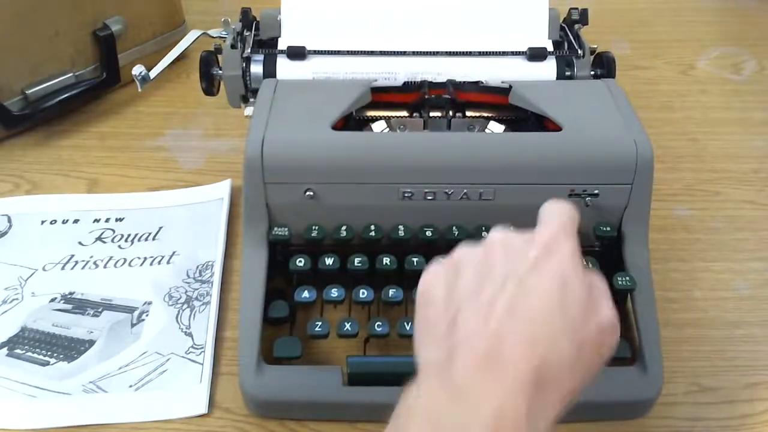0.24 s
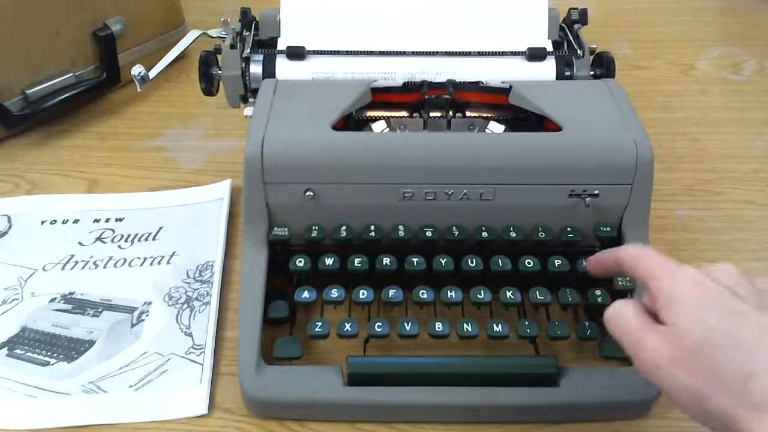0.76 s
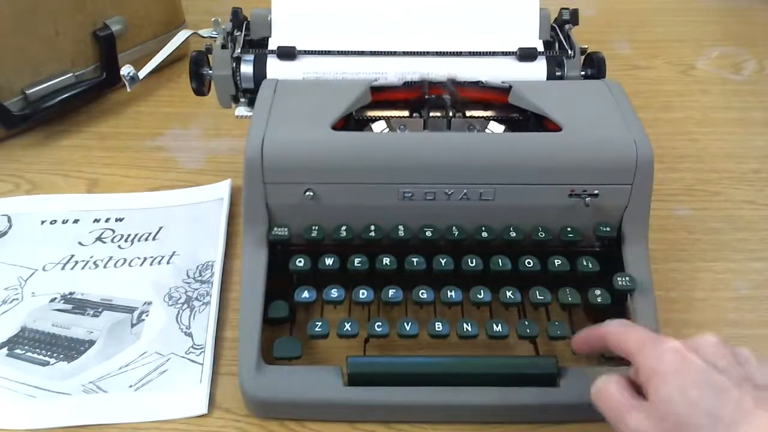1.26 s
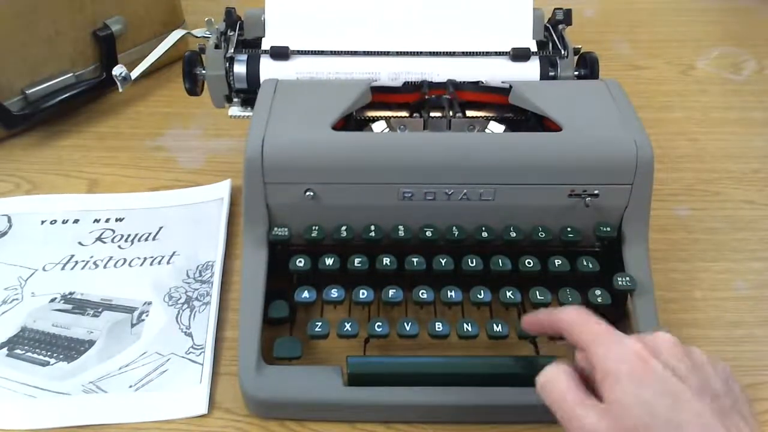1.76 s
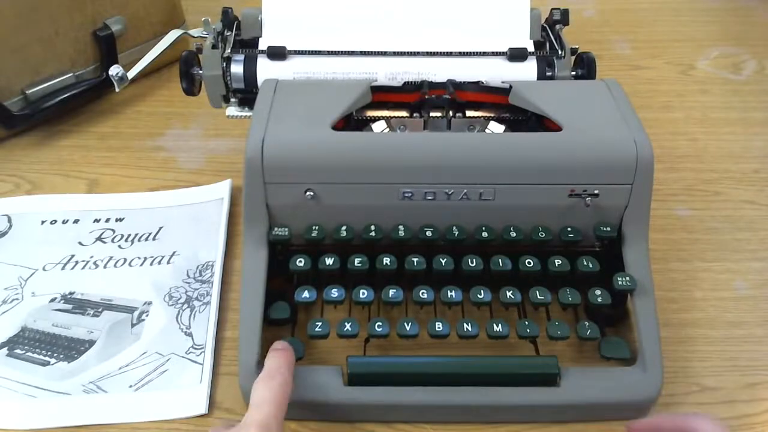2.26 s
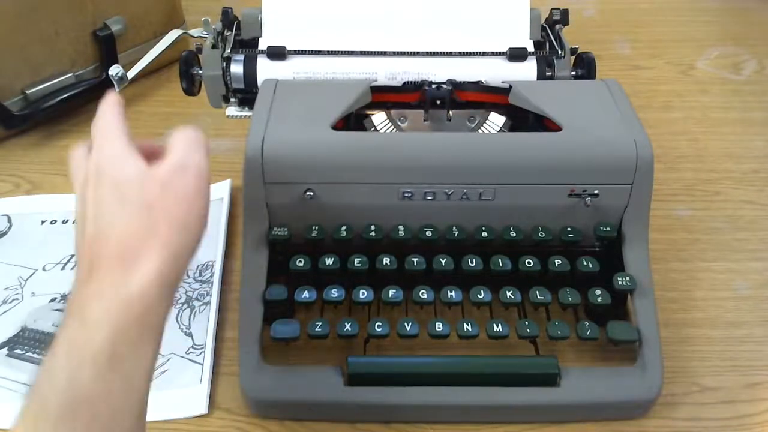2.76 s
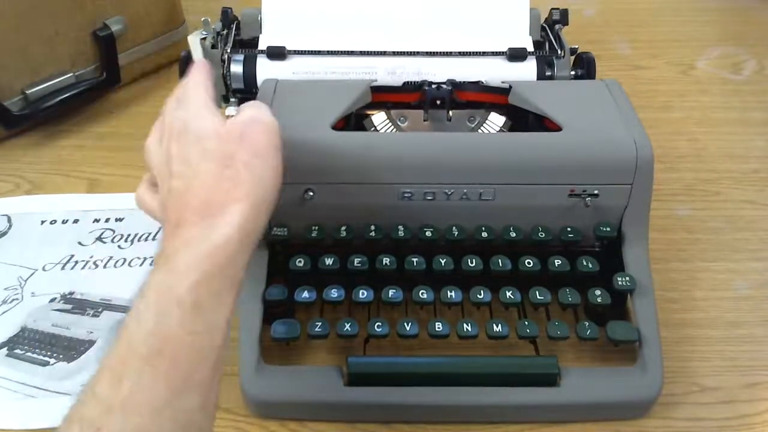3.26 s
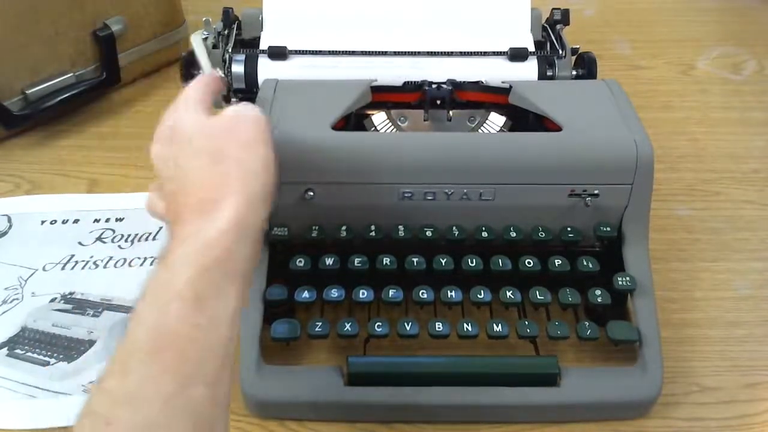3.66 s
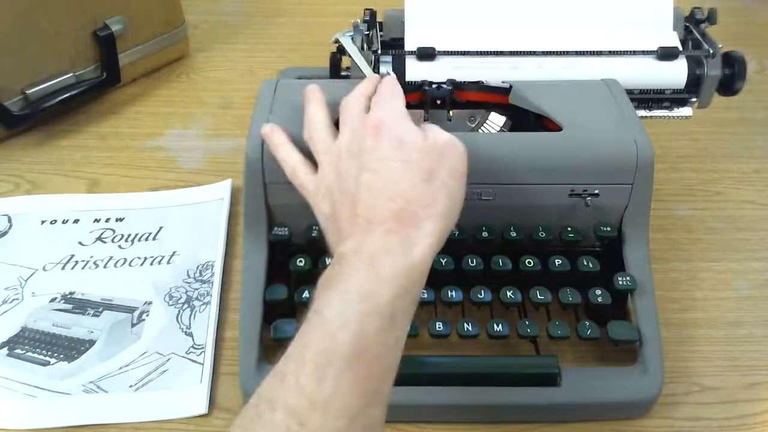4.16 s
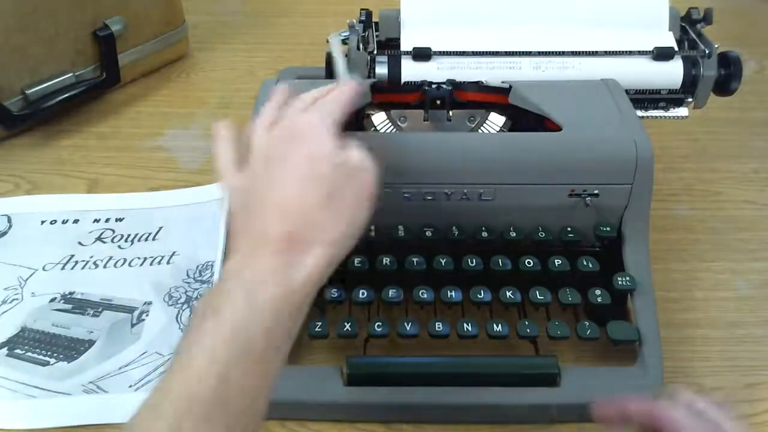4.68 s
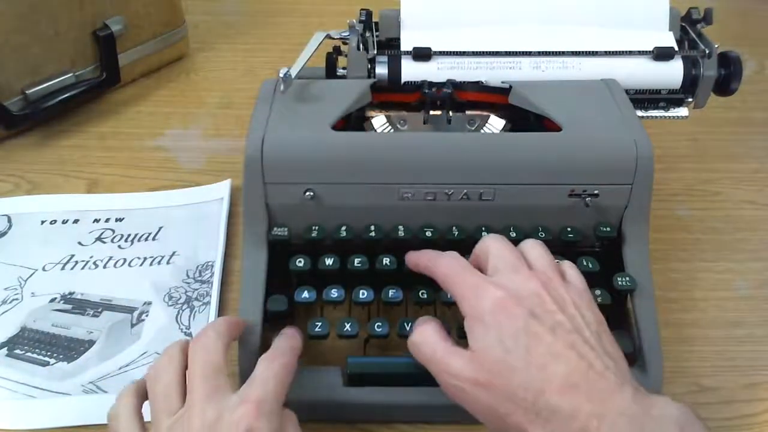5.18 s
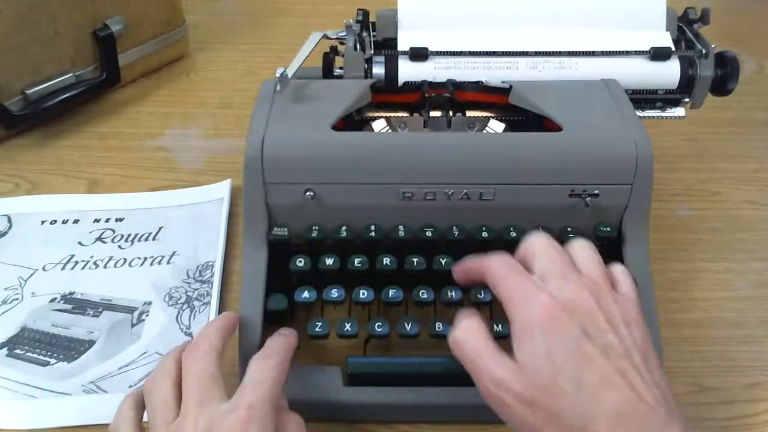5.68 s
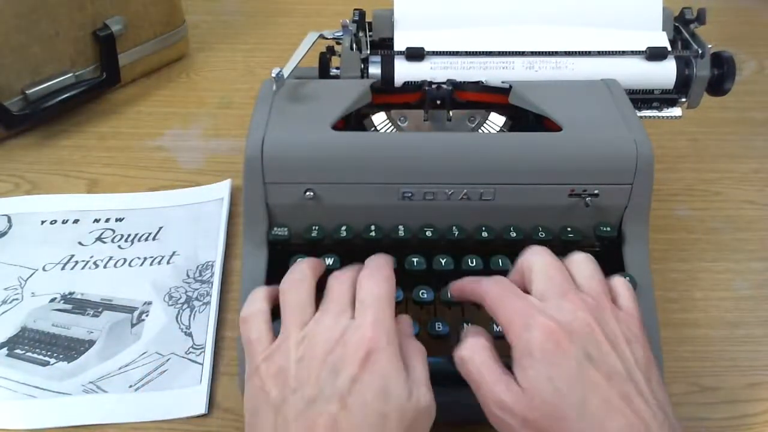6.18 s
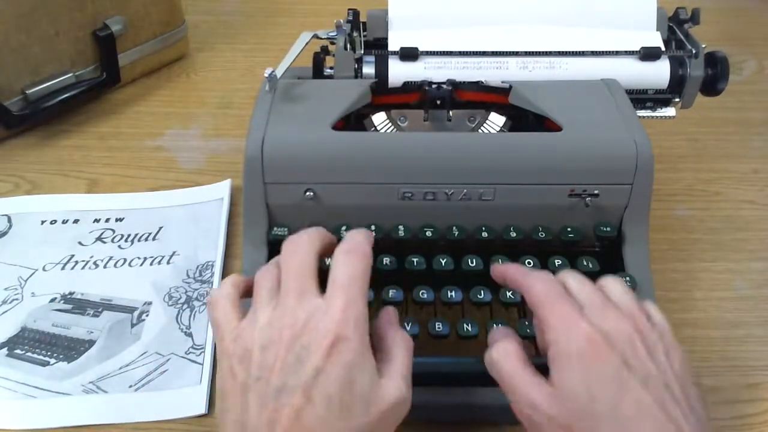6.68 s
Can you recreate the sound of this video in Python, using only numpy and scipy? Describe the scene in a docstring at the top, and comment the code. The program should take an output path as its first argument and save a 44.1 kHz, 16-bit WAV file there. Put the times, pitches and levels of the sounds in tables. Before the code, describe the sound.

Close typing on a mechanical typewriter, with metal rattles and desk thumps, broken midway by a short rasping carriage return.

```python
"""A portable manual typewriter, close up, on a wooden desk in a small bare room.
Typebars slap the platen, the carriage steps and the bars fall back; each contact rattles and rings
the metal parts, and keys and shift thump the desk. Midway the line lever clicks, the carriage is
pushed back along its rail to the stop, pawl rasping over the teeth, and typing resumes.
Faint room tone lies underneath; a narrow-band microphone rounds off the hardest slaps."""
import sys
import numpy as np
from scipy import signal
from scipy.fft import rfft, irfft, next_fast_len
from scipy.io import wavfile

SR = 44100
rng = np.random.default_rng(int(sys.argv[2]) if len(sys.argv) > 2 else 0)


def to_wav(s):
    """Save 16-bit WAV."""
    ch = np.atleast_2d(s).T  # columns
    pcm = np.round(np.clip(ch, -1, 1) * 32767)  # PCM
    wavfile.write(sys.argv[1], SR, pcm.astype(np.int16))


N = 305613
T = np.arange(SR // 2) / SR  # time axis of one event [s]

# balance of the part groups per kind of contact: (shell [dB], linkage [dB], segment [dB], steel [dB])
STRIKE_MIX_DB, STEP_MIX_DB = (-1, -0.8, -3.7, 1.06), (0, -0.5, -10.5, -13)
FALL_MIX_DB = (0.74, -1, -14.5, -16.5)
TOUCH_MIX_DB, STOP_MIX_DB = (-1.5, 0, -5, -4), (0, -2.5, -12.5, -18.5)
# gain of the same groups per dB of brightness [dB/dB]
STRIKE_TILT, RETURN_TILT = (0.043, 0, 0.52, 0.11), (-0.18, 0, 0.77, 0.94)
CLACK_TILT = (-0.13, 0.0089, 1.3, 1.24)
STRIKE_T60_S, STEP_T60_S, FALL_T60_S, CUSHION_RISE_S = 0.29, 0.28, 0.24, .0036


# keystrokes: (strike time [s], slap [dB], slap pitch [Hz], strike [dB], thump [dB], thump pitch [Hz],
# step time [s], step [dB], fall time [s], fall [dB], thud [dB], thud pitch [Hz], brightness [dB])
KEYSTROKES = [(0.0005, -13.5, 5000, -29.8, -21, 178, 0.062, -33, 0.098, -29, -15, 153, 0.5),
              (0.2051, -9.5, 5000, -28, -23, 255, 0.275, -30, 0.312, -29, -17.5, 161, 1),
              (0.7672, -7.5, 4900, -27, -24, 175, 0.859, -31.5, 0.898, -30, -21.5, 216, -3),
              (1.002, -11.5, 4900, -27.5, -25, 169, 1.044, -30, 1.107, -30, -14, 153.5, -4),
              (1.2062, -10.5, 5000, -28, -24, 183, 1.243, -27.5, 1.288, -27.5, -20, 155, 0.5),
              (1.3836, -10.5, 5000, -28.5, -21, 216.5, 1.475, -36, 1.512, -30.5, -24.5, 220, -0.5),
              (1.619, -11.5, 5000, -28.2, -29, 154.4, 1.662, -28.5, 1.703, -27.5, -20.5, 197, 0.5),
              (1.8107, -13, 5000, -28.6, -24, 177.4, 1.868, -27.5, 1.911, -30, -24.5, 165, -1.5),
              (5.5798, 1.5, 4800, -29.3, -19, 172, 5.635, -31, 5.674, -27, -23.5, 176, 11),
              (6.174, -2.5, 5000, -30, -29, 146, 6.224, -29, 6.252, -27.5, -26.5, 197, 10.5),
              (6.296, -1.5, 4550, -28.5, -17, 201, 6.387, -31.5, 6.421, -29.5, -22.5, 182, 10.5),
              (6.9179, 2.5, 4800, -22, -17, 213, 6.98, -30, 7.1, -30.5, -20, 170, 12.5)]

def typebars():
    """Per keystroke the type strikes, the key bottoms out, the carriage steps, the bar falls back."""
    out = np.zeros(N)
    for (s, slap_db, slap_hz, strike_db, thump_db, thump_hz,
         step_s, step_db, fall_s, fall_db, thud_db, thud_hz, bright_db) in KEYSTROKES:
        out += desk(s - .025, db=-43, hz=172)  # finger loads the desk
        out += strike(s, slap_db, slap_hz, part_levels(strike_db, STRIKE_MIX_DB, bright_db, STRIKE_TILT))
        out += thud(s + .008, thump_db, thump_hz)
        bottom_parts_db = part_levels(strike_db - 6, STEP_MIX_DB, bright_db)
        out += clack(s + .022, bottom_parts_db, STEP_T60_S)
        step_parts_db = part_levels(step_db, STEP_MIX_DB, bright_db, RETURN_TILT)
        out += clack(step_s, step_parts_db, STEP_T60_S, CUSHION_RISE_S)
        out += desk(step_s + .0121, step_db + 6.2, hz=165 * (1 + .06 * rng.normal()))
        fall_parts_db = part_levels(fall_db, FALL_MIX_DB, bright_db, RETURN_TILT)
        out += clack(fall_s, fall_parts_db, FALL_T60_S, CUSHION_RISE_S)
        out += thud(fall_s + .016, thud_db, thud_hz)
    return out


def strike(s, slap_db, slap_hz, parts_db, lead_s=.0009):
    """A bar swishes up through the segment, slaps the paper and shakes the machine."""
    out = np.zeros(N)
    swish = approach(parts_db, t60_s=.03 * amp(-.35 * slap_db))  # harder slap, shorter swish
    add(out, s - len(swish) / SR, amp(-3.5) * swish)
    rebound_db = -11.5 - 0.3 * slap_db  # softer slap, larger share of buzz
    add(out, s - lead_s, amp(slap_db - 2.5) * slap(slap_hz, lead_s, rebound_db))
    add(out, s, amp(-0.88) * blow(parts_db, STRIKE_T60_S, rise_s=.0024, ring_db=3, knock_db=-12))
    return out


def slap(hz, lead_s, rebound_db, width_s=.00021, rebound_t60_s=.023):
    """Type meets the platen: a snap of about two cycles, then a brief buzzing rebound."""
    t = T[:SR // 20] - lead_s
    snap = np.exp(-(t / width_s) ** 2) * np.cos(2 * np.pi * hz * (1 + 0.046 * rng.normal()) * t)
    rebound = coloured(rng.standard_normal(len(t)), STEEL_SPECTRUM) * fade(rebound_t60_s)[:len(t)]
    return snap + amp(rebound_db) * rebound * (t > 0)


# spectra of the four part groups: (frequency [Hz], level [dB])
SHELL_SPECTRUM = [(200, -20.5), (320, 0), (450, 1), (630, 0), (760, -2.5), (900, 3), (1080, -0.5),
                  (1300, -15.5), (2000, -55.5)]
LINKAGE_SPECTRUM = [(600, -39.5), (1000, -10), (1150, -2), (1350, 2.5), (1580, 0.5), (1860, -0.5),
                    (2200, -12), (2500, -26.5), (3200, -37.5), (5000, -59)]
SEGMENT_SPECTRUM = [(1400, -38.5), (2100, 1), (2400, -0.5), (2800, -1.5), (3100, -2.5), (3350, -2.5),
                    (3900, -1), (4300, -17.5), (5500, -41)]
STEEL_SPECTRUM = [(2000, -33.5), (3600, -22), (4100, -3.5), (4900, 1), (5700, -2.5), (6400, -4),
                  (7100, -10.5), (7800, -26.5)]
# frame and typebar modes under a free strike: (frequency [Hz], level [dB], t60 [s])
FRAME_MODES = [(583.5, -14.5, 0.26), (640, -11, 0.28), (887, -10.5, .25), (1150, -15, 0.26),
               (1295, -10.5, .31), (1395, -11, 0.3), (1777, -10.5, 0.099), (1855, -9, 0.17),
               (3402, -18, 0.18), (3655, -15, 0.18), (4600, -17, 0.18), (4872, -16, 0.18),
               (5453, -16.5, 0.19), (6429, -20.5, 0.2)]

def blow(parts_db, t60_s, rise_s, ring_db, knock_db, grit_db=2, crossovers_hz=(1100, 2300, 4000)):
    """One impact: a dry knock, the part groups rattle, frame and typebars ring."""
    out = np.zeros(len(T))
    for spectrum, db in zip((SHELL_SPECTRUM, LINKAGE_SPECTRUM), parts_db):
        out += amp(db) * coloured(chatter(len(T), grit_db), spectrum, ripple_db=2)
    out *= 1 + amp(knock_db) * fade(t60_s=.06)
    # treble rattle: a smooth hiss fades first, leaving a randomly uneven, slightly tonal tail
    for spectrum, db in zip((SEGMENT_SPECTRUM, STEEL_SPECTRUM), parts_db[2:]):
        hiss = coloured(chatter(len(T), grit_db), spectrum, ripple_db=2) * fade(t60_s=.4)
        tail = coloured(chatter(len(T), grit_db), spectrum, ripple_db=7.5, ripple_hz=55)
        out += amp(db) * (amp(-4.5) * hiss + amp(-1.1) * tail)
    out *= fade(t60_s)
    for hz, db, mode_t60_s in FRAME_MODES:
        part_db = parts_db[np.searchsorted(crossovers_hz, hz)]
        cycles = hz * (1 + 0.002 * rng.normal()) * T + rng.random()
        decay = fade(mode_t60_s * t60_s / STRIKE_T60_S)  # damped blows ring shorter
        out += amp(part_db + db + ring_db + rng.normal(0, 2.0)) * decay * np.sin(2 * np.pi * cycles)
    return out * rise(rise_s)


def approach(parts_db, t60_s):
    """A moving lever scrapes, swelling up to the moment of contact."""
    size = SR // 10
    spectra = (SHELL_SPECTRUM, LINKAGE_SPECTRUM, SEGMENT_SPECTRUM, STEEL_SPECTRUM)
    friction = sum(amp(db) * coloured(chatter(size, grit_db=5.5), spectrum)
                   for spectrum, db in zip(spectra, parts_db))
    swell = (fade(t60_s) * rise(.0004))[:size][::-1]
    return friction * swell


def clack(s, parts_db, t60_s, rise_s=.0012):
    """A duller contact: a lever slides home and meets its stop."""
    out = np.zeros(N)
    slide = approach(parts_db, t60_s=.033)
    add(out, s - len(slide) / SR, amp(-4.5) * slide)
    add(out, s, amp(-3.5) * blow(parts_db, t60_s, rise_s, ring_db=4.5, knock_db=-8))
    return out


def part_levels(db, mix_db, bright_db, tilt=CLACK_TILT):
    """Shell, linkage, segment and steel levels [dB]; harder contacts wake more of the small parts."""
    return db + np.array(mix_db) + bright_db * np.array(tilt)


def thud(s, db, hz, rock_s=.05):
    """The machine's weight lands on the desk and rocks back once."""
    return desk(s, db, hz) + desk(s + rock_s, db - 13.5, hz * .9)


# low boom of desk and room: (frequency [Hz], level [dB])
BOOM_SPECTRUM = [(25, -39.5), (50, -27), (72, -6), (90, -9), (140, 2.5), (200, -1.5), (230, -13.5),
                 (265, 0), (330, -20), (500, -40), (1000, -72)]
# low room modes: (frequency [Hz], level [dB], t60 [s])
ROOM_MODES = [(75, -20, .32), (146.87, -7.5, .27), (265.2, -16.5, .24)]

def desk(s, db, hz, sag=0.13):
    """A push swings the desk top briefly, sinking in pitch; the room's boom and modes follow."""
    out = np.zeros(N)
    pitch_hz = hz * (1 + sag * (2 * fade(.24) - 1.3))
    swing = np.sin(2 * np.pi * np.cumsum(pitch_hz) / SR) * fade(.13) * rise(.004) ** 2
    boom = coloured(rng.standard_normal(len(T)), BOOM_SPECTRUM) * fade(.31) * rise(.0079)
    modes = sum(amp(mode_db) * fade(t60_s) * np.sin(2 * np.pi * (mode_hz * T + rng.random()))
                for mode_hz, mode_db, t60_s in ROOM_MODES)
    add(out, s, amp(db) * (amp(3.5) * swing + amp(-5.5) * boom + modes * rise(.015)))
    return out


# shift, line lever, carriage stop and space bar:
# (time [s], touch [dB], stop [dB], brightness [dB], stop t60 [s], thud [dB], thud pitch [Hz])
LEVERS = [(2.643, -42, -30.5, -0.5, .24, -16, 148), (3.276, -46, -42.5, -3, 0.26, -28, 152),
          (3.374, -58, -45.5, -7, 0.16, -28.5, 213), (3.771, -45, -35.5, 2.5, 0.14, -25, 189),
          (4.263, -59, -32, 4, 0.25, -37, 236), (4.724, -34, -34, -4, 0.21, -26.5, 240.6),
          (5.357, -65, -57, -7, 0.36, -18.5, 160), (5.838, -48, -33, -0.5, 0.22, -19.5, 160),
          (6.491, -47, -31, 3.5, 0.39, -19.5, 155), (6.594, -55, -31.5, 1, 0.32, -27.5, 141),
          (6.627, -46, -32, 6, 0.26, -28, 147)]

def levers(play_s=.016, desk_lag_s=.005):
    """Each lever takes up its play with a light touch, hits its stop and thumps the desk."""
    out = np.zeros(N)
    for s, touch_db, stop_db, bright_db, t60_s, thud_db, thud_hz in LEVERS:
        out += clack(s - play_s, part_levels(touch_db, TOUCH_MIX_DB, bright_db), t60_s=.2)
        out += clack(s, part_levels(stop_db, STOP_MIX_DB, bright_db), t60_s)
        out += thud(s + desk_lag_s, thud_db, thud_hz)
    return out


# catches, stops and knocks: (time [s], level [dB], pitch [Hz], ring t60 [s])
CATCHES = [(0.099, -30.5, 1380, .07), (0.308, -36, 4430, 0.04), (0.9, -36, 1850, .12),
           (1.004, -32, 2200, .06), (1.512, -40, 4440, 0.1), (2.377, -50, 6660, 0.075),
           (2.641, -28, 645, 0.16), (2.643, -33, 861, .18), (2.645, -39, 1350, .16),
           (2.645, -42, 1830, .17), (3.378, -30, 270, 0.11), (3.368, -45, 620, .1),
           (3.419, -40.5, 4350, 0.095), (3.756, -47, 2800, 0.067), (4.261, -29, 1880, 0.12),
           (4.262, -36, 2250, .15), (4.261, -35.5, 4680, 0.075), (4.263, -46, 4050, .22),
           (4.718, -46.5, 5100, 0.069), (4.803, -39.5, 4430, 0.065), (4.804, -43, 6200, .09),
           (4.811, -39, 4400, 0.09), (4.856, -51, 4500, 0.08), (5.36, -48, 547, 0.22),
           (5.524, -55, 780, .1), (5.816, -42, 1500, .08), (5.837, -30.5, 700, 0.07),
           (6.252, -33, 1350, .12), (6.296, -27, 3750, .035), (6.302, -28, 700, 0.057),
           (6.386, -33, 1326, .14), (6.491, -30, 1354, 0.08), (6.591, -35, 557, .05),
           (6.607, -37, 1350, .12)]

def catches(spread=0.013, mode_count=7):
    """A part snapping over rings in a tight cluster of modes, over a broader crack."""
    out = np.zeros(N)
    for s, db, hz, t60_s in CATCHES:
        detune, phase = rng.standard_normal((2, mode_count, 1))
        ring = unit(np.sin(2 * np.pi * (hz * (1 + spread * detune) * T + phase)).sum(axis=0))
        skirt = [(hz / 2, -45), (hz * .82, -3), (hz, 0), (hz * 1.35, -5), (hz * 2, -45)]
        crack = coloured(chatter(len(T), grit_db=4.5), skirt, ripple_db=-1.5)
        snap = amp(-1.5) * ring * fade(t60_s) + amp(-3) * crack * fade(1.3 * t60_s)
        add(out, s, amp(db) * snap * rise(.00066))
    return out


# rasp of the carriage return, rising with speed: (time [s], level [dB])
RASP_ENVELOPE = [(3.83, -50), (3.89, -42.5), (3.95, -32), (3.99, -29.5), (4.04, -32.5), (4.11, -33.5),
                 (4.17, -41), (4.245, -47.5)]
# spectra of the carriage parts: (frequency [Hz], level [dB])
RAIL_SPECTRUM = [(250, -59), (400, -19), (465, -11), (540, -11), (650, -4), (710, -9), (780, 4), (870, 2.5),
                 (1080, -1), (1400, -35.5)]
RACK_SPECTRUM = [(800, -15.5), (1150, -4.5), (1310, 7), (1480, 1), (1640, 2), (1850, 0), (2140, -6.5),
                 (2700, -30)]
PAWL_SPECTRUM = [(1800, -27.5), (2400, 3.5), (3200, 0), (4400, 2.5), (5000, 2), (5500, 1), (6050, 4),
                 (7000, -10.5), (7800, -27)]
# rail, rack and pawl against the rasp: (offset at full speed [dB], slope [dB/dB])
CARRIAGE_PARTS = [(-3, 1.5), (-1.4, 1.06), (-7.5, 1.09)]

def carriage(peak_teeth_per_s=140, tooth_t60_s=.016, rolling=0.8, rail_places=7):
    """The pawl rasps over the escapement teeth with the push; resonances shift along the rail."""
    out = np.zeros(N)
    times_s, rasp_db = np.transpose(RASP_ENVELOPE)
    start_s, end_s = times_s[0], times_s[-1]
    t = start_s - .1 + np.arange(SR) / SR
    effort_db = np.interp(t, times_s, rasp_db) - rasp_db.max()
    parts_db = [rasp_db.max() + db + slope * effort_db for db, slope in CARRIAGE_PARTS]
    speed = amp(effort_db / 2)
    teeth_passed = np.floor(np.cumsum(peak_teeth_per_s * speed) / SR)
    tooth_pulses = np.diff(teeth_passed, prepend=0)
    rasp = signal.fftconvolve(tooth_pulses, fade(tooth_t60_s))[:SR] + rolling
    moving = np.clip(np.minimum(t - start_s + .029, end_s + .028 - t) / .022, 0, 1)
    places_s, gap_s = np.linspace(start_s, end_s, rail_places, retstep=True)
    for place_s in places_s:
        crossfade = np.sqrt(np.clip(1 - np.abs(t - place_s) / gap_s, 0, 1))
        for db, spectrum in zip(parts_db, (RAIL_SPECTRUM, RACK_SPECTRUM, PAWL_SPECTRUM)):
            part = coloured(rasp * chatter(SR, grit_db=1.5), spectrum, ripple_db=4.5, ripple_hz=50.06)
            add(out, t[0], amp(db) * moving * crossfade * part)
    return out


# ringing spots on the rail: (time [s], level [dB], pitch [Hz], length [s])
RAIL_SPOTS = [(3.93, -37.5, 800, .09), (3.945, -33, 1320, .1), (3.96, -38, 930, .08),
              (4.06, -41, 1200, .09)]

def rail_resonances(relative_width=.03):
    """The rolling carriage makes single rail resonances swell out of the rasp."""
    out = np.zeros(N)
    edge, skirt = 1 + relative_width, 1 + 4 * relative_width
    for s, db, hz, length_s in RAIL_SPOTS:
        band = [(hz / skirt, -50), (hz / edge, 0), (hz * edge, 0), (hz * skirt, -50)]
        swell = np.sin(np.pi * np.clip(T / length_s, 0, 1))
        add(out, s, amp(db) * swell * coloured(rng.standard_normal(len(T)), band))
    return out


# key levers and bars rattling between strokes: (time [s], level [dB], t60 [s])
RATTLES = [(0.135, -35.5, .2), (0.8, -29, .14), (0.832, -34, .15), (0.93, -36, .15), (1.092, -35, .1),
           (1.335, -35, 0.18), (1.56, -41, 0.2), (1.773, -37, .16), (1.93, -37, .12), (2.661, -32, .12),
           (2.688, -33, .16), (6.279, -33, .14), (6.655, -37, .22)]

def rattles():
    """Loose levers knock against their rests, dull and brief."""
    return sum(clack(s, part_levels(db, FALL_MIX_DB, bright_db=0), t60_s, CUSHION_RISE_S)
               for s, db, t60_s in RATTLES)


# metal part sliding under the hand: (frequency [Hz], level [dB])
SCRAPE_SPECTRUM = [(1400, -35), (1700, -3), (1950, 4), (2300, -1), (3000, -2), (3800, -5), (4400, -18),
                   (6000, -15), (7100, -14), (7800, -40)]

def scrape(s=2.383, db=-34.5, rise_s=.015, t60_s=.17):
    """Metal slides on metal: a quick swell, then a dry, gritty decay."""
    out = np.zeros(N)
    swell = np.clip(T / rise_s, 0, 1) ** 2
    friction = coloured(chatter(len(T), grit_db=3), SCRAPE_SPECTRUM, ripple_db=3)
    add(out, s - rise_s, amp(db) * friction * swell * fade(t60_s))
    return out


# loose parts ticking: (time [s], level [dB], brightness [dB], t60 [s])
TICKS = [(0.713, -54, 3, 1), (0.308, -41, 6, 0.19), (1.6, -43, 6, 0.25), (1.793, -42, 3.5, 0.25),
         (2.378, -59, 5, 0.18), (3.11, -70, 7, 0.55), (3.19, -63, 5, 0.3), (3.42, -54, 6.5, 0.24),
         (3.66, -61.5, 3.5, 0.35), (4.803, -50.5, 0.5, 0.23), (4.857, -49, -3, 0.25), (5.817, -43, 1, .2)]
# soft pushes on the desk: (time [s], level [dB], pitch [Hz])
BUMPS = [(0.355, -24, 150), (0.47, -38, 161.7), (0.676, -48, 198), (0.83, -28.5, 135), (1.598, -22, 138),
         (1.985, -32.5, 160.4), (2.292, -43.5, 215), (2.41, -50, 230), (2.475, -51, 215),
         (2.664, -18.5, 150), (2.672, -27, 108), (2.686, -17.5, 150), (2.75, -27, 135), (2.778, -31, 128),
         (3.81, -29, 135), (3.845, -32, 135), (3.948, -30.5, 135), (3.99, -31, 135), (4.03, -26, 132),
         (4.169, -42, 160), (4.282, -34, 235), (4.943, -39, 203), (5.123, -45, 221), (5.312, -39, 206.2),
         (5.49, -30.5, 200), (5.765, -31, 160), (5.93, -30.5, 155.5), (6.565, -25, 162), (6.7, -32, 164)]

def handling():
    """Parts tick as the hands take hold or let go; hands and carriage bump the desk."""
    ticks = sum(clack(s, part_levels(db, TOUCH_MIX_DB, bright_db), t60_s)
                for s, db, bright_db, t60_s in TICKS)
    return ticks + sum(desk(s, db, hz) for s, db, hz in BUMPS)


# room tone: (frequency [Hz], level [dB])
ROOM_SPECTRUM = [(15, -55.5), (25, -42.5), (143, 4.5), (418, -16.5), (643, -10), (707, -11.5), (1040, -12),
                 (1250, -14), (1410, -14.5), (6520, -32), (7520, -43), (9780, -85), (16500, -120)]

def room_tone(db=-68):
    """Faint, steady, mostly low noise of the room."""
    return amp(db) * coloured(rng.standard_normal(N), ROOM_SPECTRUM)


def chatter(size, grit_db):
    """Countless tiny metal contacts of uneven strength, about 1 ms each."""
    knots = rng.standard_normal(size // 44 + 2)
    strength = np.interp(np.arange(size), np.linspace(0, size, len(knots)), knots)
    return amp(grit_db * strength) * rng.standard_normal(size)


def coloured(x, spectrum, ripple_db=0, ripple_hz=45):
    """Filter x by (frequency [Hz], level [dB]) points, to rms 1; ripple adds random peaks and dips."""
    hz, db = np.transpose(spectrum)
    size = next_fast_len(len(x))
    bins_hz = np.fft.rfftfreq(size, 1 / SR)
    knots = rng.standard_normal(400)
    ripple = ripple_db * np.interp(bins_hz / ripple_hz, np.arange(len(knots)), knots)
    gain = amp(np.interp(np.log(bins_hz + 1), np.log(hz), db) + ripple)
    return unit(irfft(rfft(x, size) * gain, size)[:len(x)])


def amp(db):
    """Decibels to gain."""
    return 10 ** (np.asarray(db) / 20)


def unit(x):
    """Scale to rms 1."""
    return x / np.sqrt(np.mean(x ** 2) + 1e-20)


def fade(t60_s):
    """Exponential decay, 60 dB in t60_s."""
    return np.exp(-np.log(1000) * T / max(t60_s, 1e-3))


def rise(tau_s):
    """Exponential onset from 0 towards 1."""
    return 1 - np.exp(-T / tau_s)


def add(track, s, x):
    """Mix x into the track from time s."""
    start = int(round(s * SR))
    x = x[max(-start, 0):max(N - start, 0)]
    track[max(start, 0):][:len(x)] += x


def scene():
    """The typewriter over a very quiet room, mono."""
    machine = typebars() + rattles() + levers() + handling() + catches() + scrape()
    carriage_return = carriage() + rail_resonances()
    return (machine + carriage_return + room_tone())[None]


def record(dry, ceiling=.9, low_hz=45, top_hz=7750, leak_db=-17, leak_top_hz=9700):
    """A narrow-band microphone: rounds the hardest slaps, cuts deep bass, leaks a trace of the top."""
    rounded = dry / (1 + np.abs(dry / ceiling) ** 6) ** (1 / 6)
    highpassed = signal.sosfilt(signal.butter(2, low_hz, 'high', fs=SR, output='sos'), rounded)
    size = next_fast_len(N + SR // 2)
    hz = np.fft.rfftfreq(size, 1 / SR)
    band = np.maximum(1 / np.sqrt(1 + (hz / top_hz) ** 100), amp(leak_db))
    leak_cutoff = 1 / np.sqrt(1 + (hz / leak_top_hz) ** 100)
    return irfft(rfft(highpassed, size) * band * leak_cutoff, size)[:, :N]


dry = scene()
out = record(dry)
to_wav(out)
```